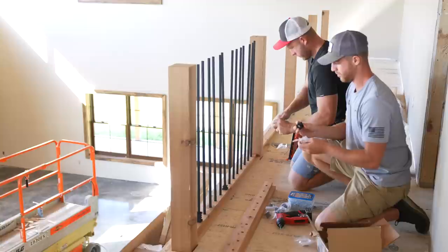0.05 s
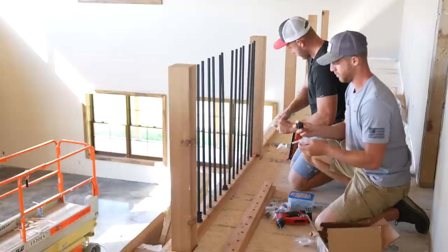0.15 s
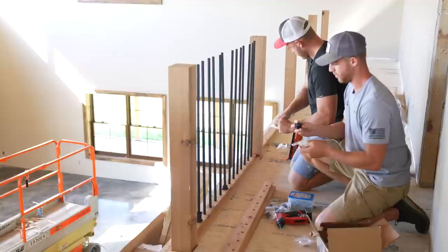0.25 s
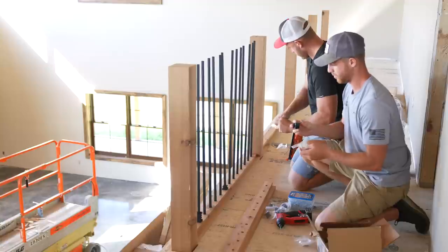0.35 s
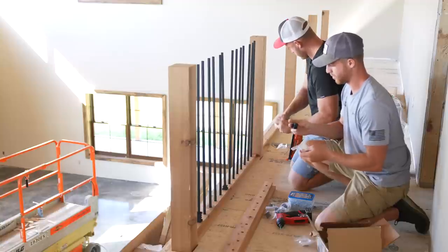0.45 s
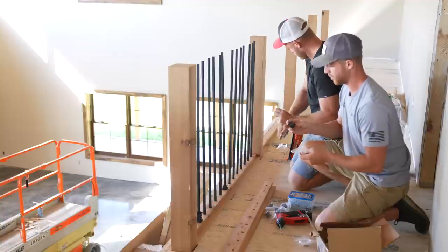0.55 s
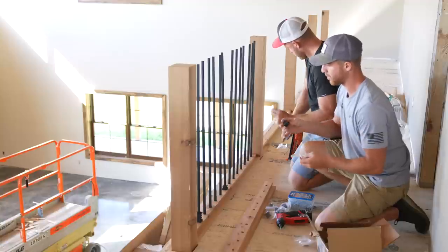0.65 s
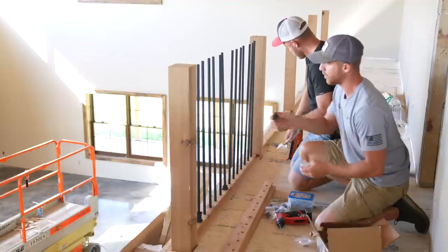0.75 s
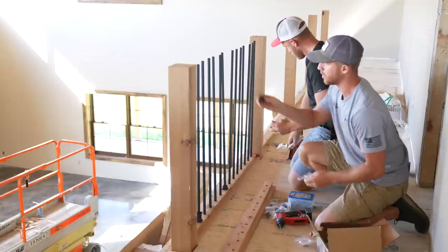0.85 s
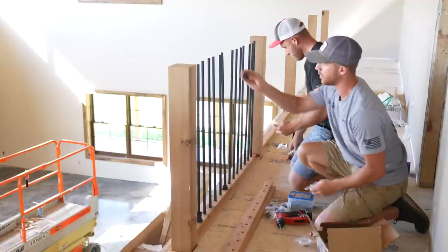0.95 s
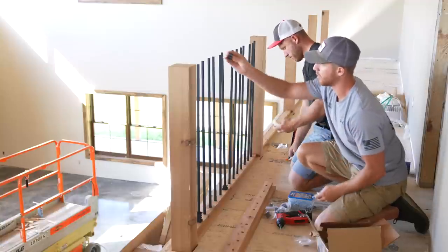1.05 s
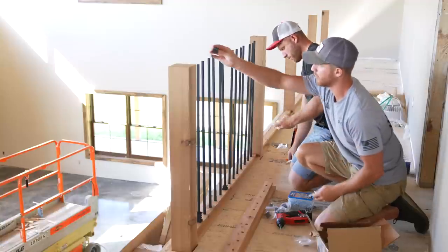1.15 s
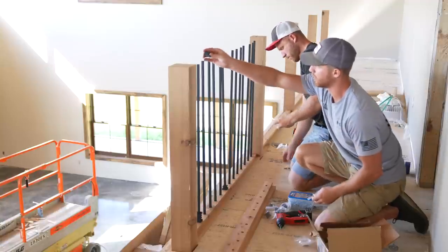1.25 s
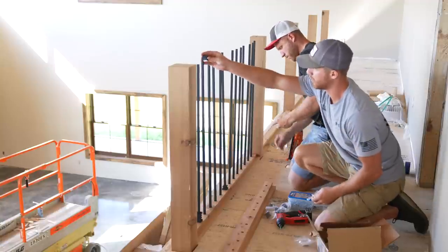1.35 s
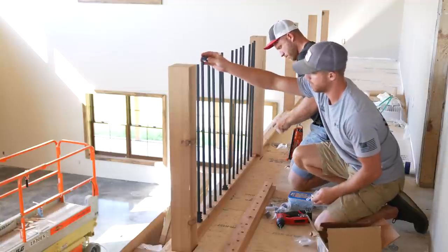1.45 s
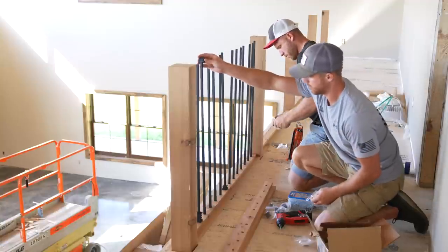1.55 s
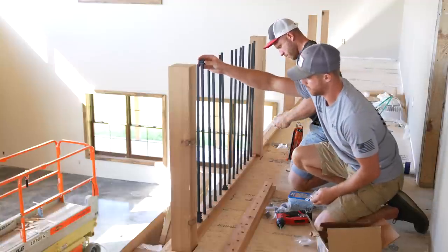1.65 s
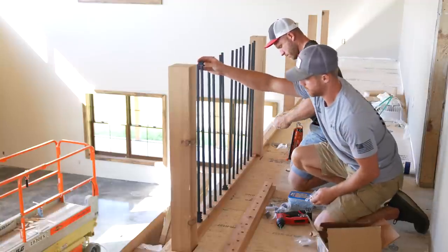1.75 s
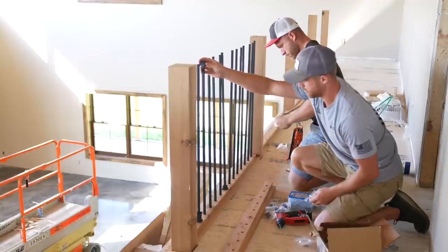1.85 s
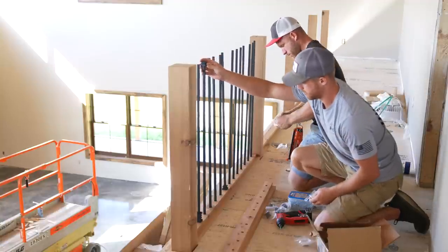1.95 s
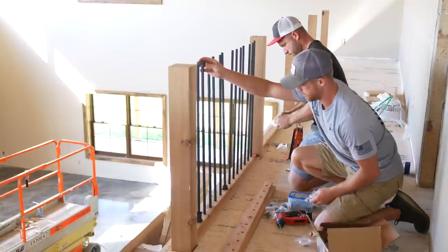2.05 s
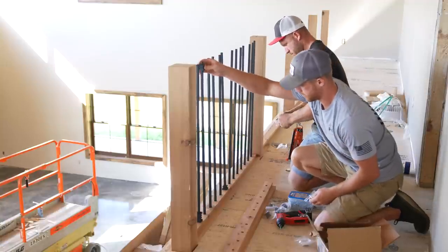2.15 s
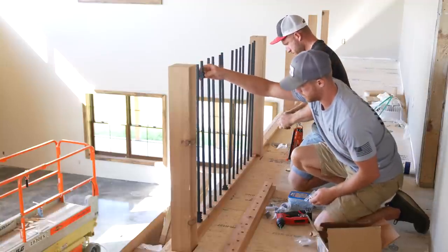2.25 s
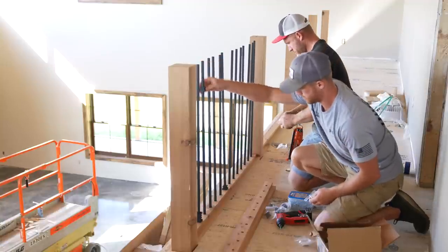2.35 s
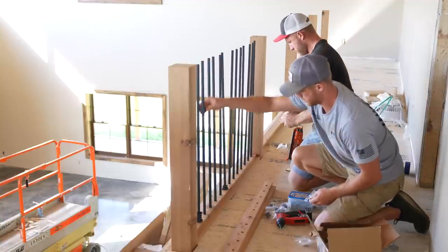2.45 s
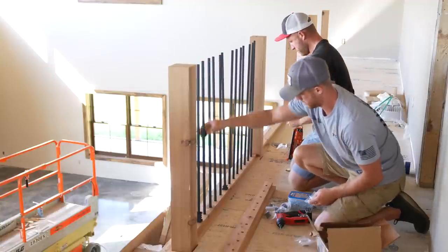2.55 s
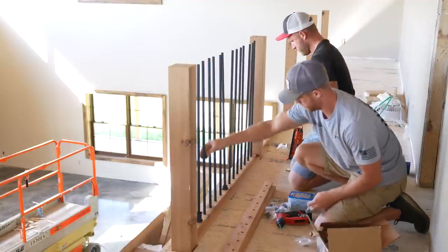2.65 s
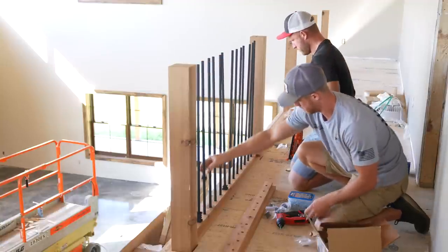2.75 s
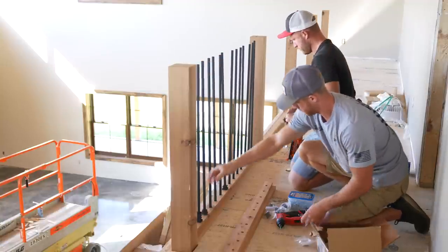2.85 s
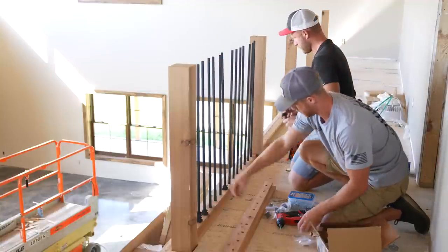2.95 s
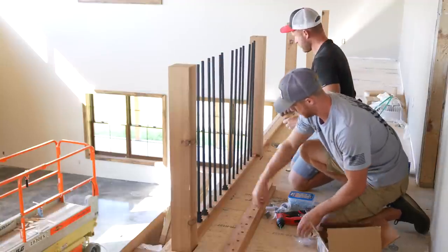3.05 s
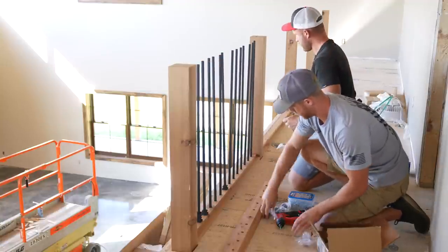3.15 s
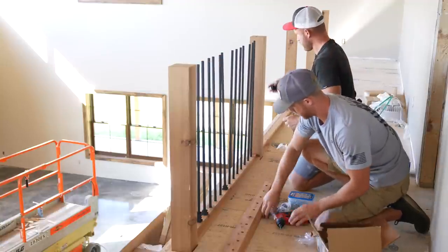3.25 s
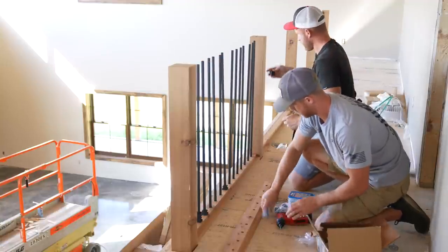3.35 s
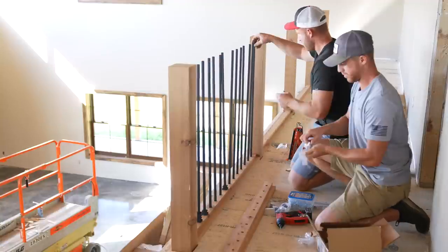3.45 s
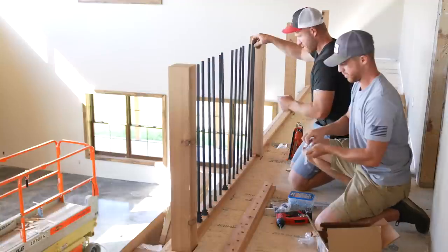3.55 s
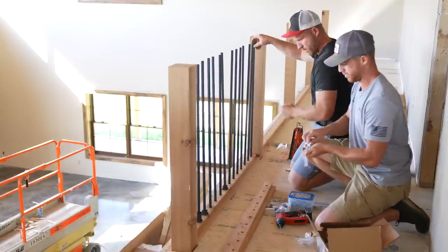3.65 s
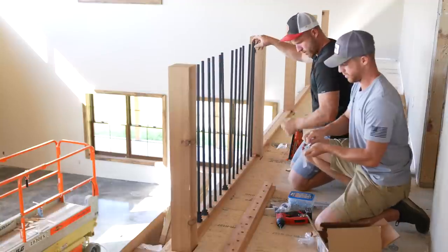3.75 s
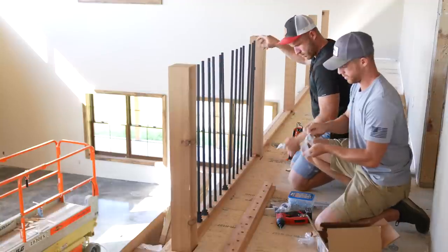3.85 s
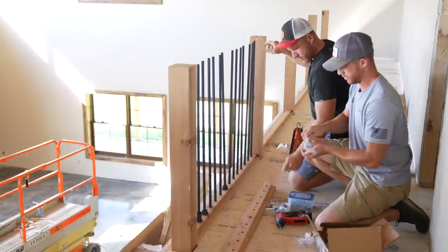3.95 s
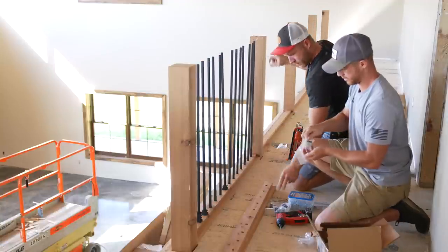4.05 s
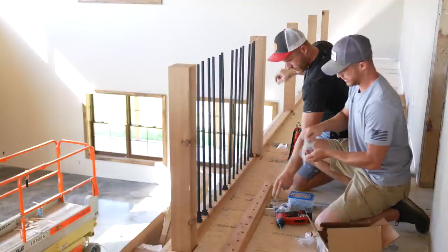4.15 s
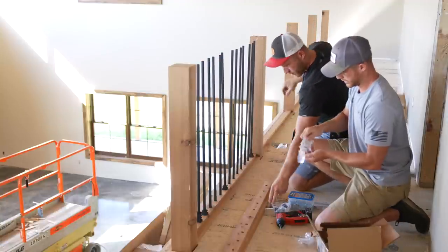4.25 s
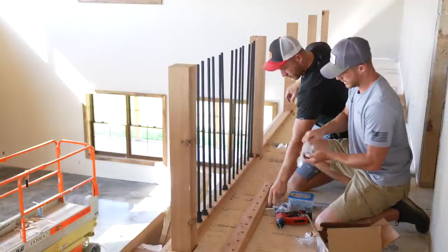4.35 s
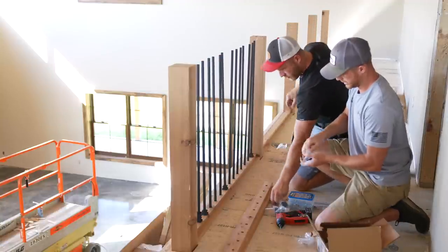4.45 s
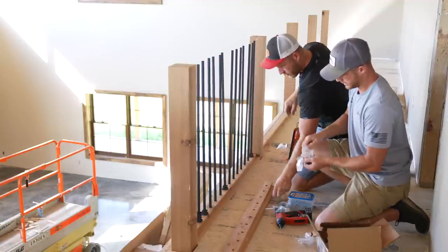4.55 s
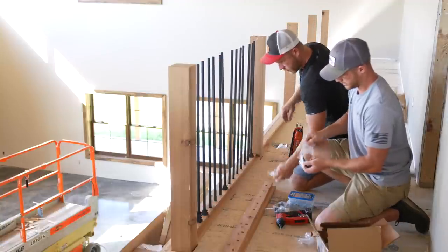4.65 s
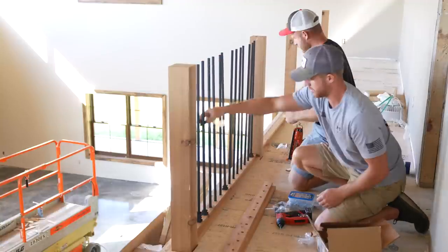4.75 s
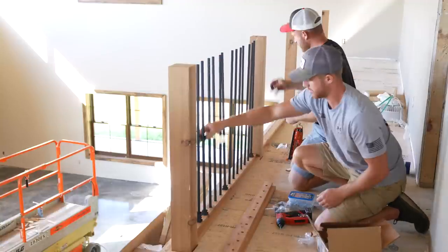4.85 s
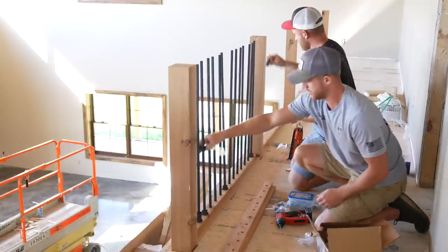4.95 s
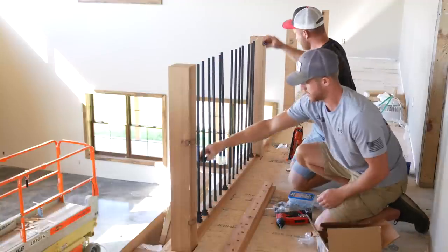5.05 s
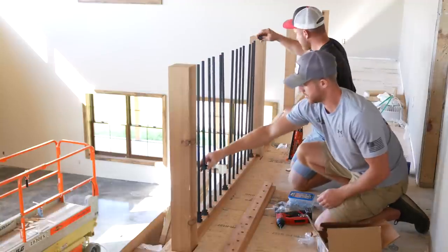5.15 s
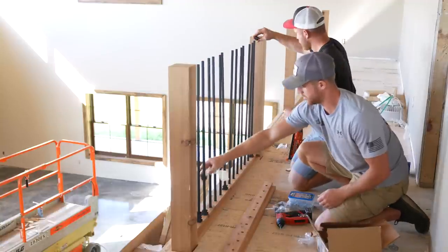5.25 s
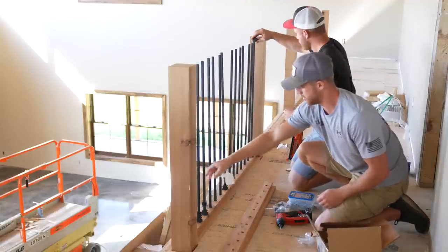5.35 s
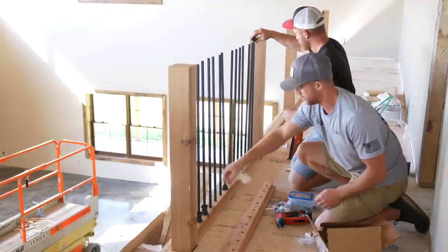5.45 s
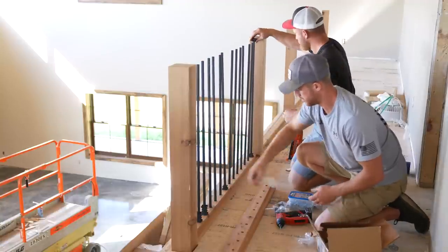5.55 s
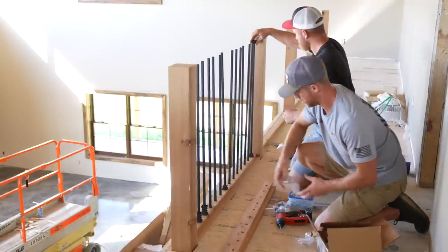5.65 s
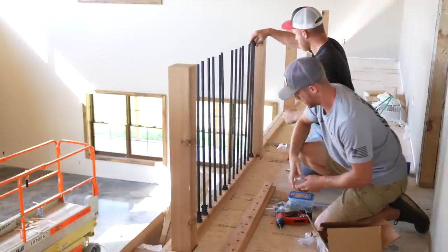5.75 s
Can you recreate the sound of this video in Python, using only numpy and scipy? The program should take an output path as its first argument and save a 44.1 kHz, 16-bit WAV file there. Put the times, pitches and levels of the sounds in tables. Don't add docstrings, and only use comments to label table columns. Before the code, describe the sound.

Close to the microphone in a hard, empty building, a brief metallic rub and stiff wrapping crackles open the scene. A dull clunk with quick rebounds lands at 0.5 s, followed by sparse crackles and faint high squeaks near 1.2 s. A short clank with a woody knock comes at 1.3 s, then dense metal ticks and soft bar taps. From 2.2 s a collar slides down an iron bar, its singing scrape swelling into a thin whine, ending at 2.9 s in a loud, sharp, ringing drop on timber. The echo is cut near 3.45 s. Faint scrapes and ticks lead to a second ringing clank at 4.2 s, with rattling rebounds. Low plank knocks follow around 4.6 s. After another cut, a steadier singing slide runs from 4.8 to 5.35 s, then a very bright, hard clank at 5.45 s bounces and echoes out. Quiet air and rustling clothes lie underneath.

```python
import sys
import numpy as np
from scipy import signal
from scipy.fft import rfft, irfft
from scipy.io import wavfile
from scipy.ndimage import uniform_filter1d

SR = 44100
rng = np.random.default_rng(int(sys.argv[2]) if len(sys.argv) > 2 else 0)


def ratio_of_db(decibels):
    return 10 ** (np.asarray(decibels, float) / 20)


def digitize_waveform(pressure):
    field = np.atleast_2d(pressure).T
    bounded = np.clip(field, -1, 1)
    quanta = np.round(bounded * 32767).astype(np.int16)
    wavfile.write(sys.argv[1], SR, quanta)


N = 255339


def peaked(x, db):
    return x * ratio_of_db(db) / np.max(np.abs(x))


def unit(x):
    return x / np.sqrt(np.mean(x ** 2))


def smooth_noise(samples):
    return unit(uniform_filter1d(uniform_filter1d(rng.standard_normal(N), samples), samples))


def add(track, s, sound):
    i = int(s * SR)
    track[i:i + len(sound)] += sound[:N - i]


def on_log(hz, table):
    table_hz, value = np.transpose(table)
    return np.interp(np.log(hz + 1), np.log(table_hz), value)


def high_pass(x, order, hz):
    return signal.sosfilt(signal.butter(order, hz, "high", fs=SR, output="sos"), x)


def resonate(x, hz, width_hz):
    return signal.lfilter(*signal.iirpeak(min(hz, .45 * SR), hz / width_hz, fs=SR), x)


def coloured(x, table):
    gain = ratio_of_db(on_log(np.fft.rfftfreq(len(x), 1 / SR), table))
    cepstrum = irfft(np.log(gain), len(x))
    cepstrum[1:len(x) // 2] *= 2
    cepstrum[len(x) // 2 + 1:] = 0
    return irfft(rfft(x) * np.exp(rfft(cepstrum)), len(x))


def burst(decay_s, rise_s=0.0003):
    t = np.arange(4096) / SR
    return rng.standard_normal(len(t)) * (1 - np.exp(-t / rise_s)) * np.exp(-t / decay_s)


def bouts(rows):
    t = np.arange(N) / SR
    swells = [db - np.maximum(rise * (s - t), fall * (t - s)) for s, db, rise, fall in rows]
    return ratio_of_db(np.max(swells, axis=0))


def first_contact(hz, crack_ms):
    t = np.arange(4096) / SR
    turn = 2 * np.pi * hz * t
    tones = np.sin(turn) + ratio_of_db(-8) * np.sin(1.9 * turn)
    return tones * t * np.exp(-t / (.0006 * crack_ms))


def ring(modes):
    t = np.arange(int(.52 * SR)) / SR
    hz, db, t60 = np.transpose(modes)[:, :, None]
    phase, detune, twin_phase = rng.random((3, len(modes), 1))
    twin_hz = hz * (1.005 + .012 * detune)
    pair = np.sin(2 * np.pi * (hz * t + phase)) + .6 * np.sin(2 * np.pi * (twin_hz * t + twin_phase))
    fade = np.exp(-np.log(1000) * t / t60)
    return np.sum(ratio_of_db(db) * fade * pair, axis=0) * (1 - np.exp(-t / 0.000044))


# start in seconds, peak level in dB, crack pitch
# in Hz, crack length in ms, level sent to the room in dB.
DROPS = [
    (0.5093, -9, 2800, 0.68, -17.5),
    (1.3245, -6, 2630, 0.85, -6),
    (2.93, 1.5, 3390, 0.65, -9),
    (4.1665, -2.5, 3250, 0.84, -7),
    (5.4468, 2, 9300, 0.21, -10.5),
]
DROP_GRIT_DB = [-3.5, -2.5, -4, -2, -5.5]
# frequency in Hz, level in dB per Hz.
DROP_COLOURS = [
    [(47, -64), (80, -31), (248, -12), (296, -39), (471, -11.5), (785, -8.5), (5900, -2), (16000, -12.5)],
    [(60, -50), (150, -12.5), (700, -6.5), (1100, -1.5), (1600, 0), (2500, -7), (5000, -12.5), (16000, -18)],
    [(380, -28), (482, -16), (643, -25), (810, -10.5), (1060, -16.5), (2400, 0.5), (5400, -3.5),
     (16000, -22)],
    [(47, -73), (80, -37.5), (400, -14.5), (802, -26.5), (1000, -15.5), (3620, -3.5), (8050, -12),
     (16000, -20.5)],
    [(60, -37), (369, -25.5), (493, -24.5), (550, -33.5), (820, -19), (980, -22), (2780, -6.5),
     (16000, -15.5)],
]
DROP_MODES_HZ = [
    [800, 3020, 4370, 5240],
    [820, 1070, 1400, 2700],
    [490, 822, 1240, 2320, 2980, 3225, 3700, 4550, 5300, 6150, 9625, 14230, 15400],
    [480, 822, 1750, 2320, 2966, 3714, 4468, 5276, 6148, 9604, 11260, 14520, 15300],
    [492, 822, 1965, 2750, 3058, 3600, 4549, 5560, 7515, 9760, 14400],
]
# level in dB, t60 in seconds.
DROP_RINGS = [
    [(1.5, 0.017), (-8, 0.037), (-12, 0.032), (-7.5, 0.027)],
    [(-8, 0.029), (-7.5, 0.13), (-14, 0.23), (-0.5, 0.042)],
    [(-27, 0.82), (-22, 0.9), (-27.5, 0.91), (-6.5, 0.17), (-9.5, 0.2), (4, 0.038), (-12, 0.24),
     (-19, 0.13), (-6, 0.093), (-4, 0.054), (-20, 0.18), (-15, 0.09), (-12, .07)],
    [(-28, 0.42), (-6.5, 0.1), (-4.5, 0.04), (-9, .07), (-35, .09), (-9, 0.28), (-9, 0.2), (-8, 0.069),
     (1, 0.031), (-29, 0.35), (-14, .1), (-16, .15), (-17, .08)],
    [(-29, 0.66), (-28, 1), (-2.5, 0.061), (5.5, 0.03), (-8, 0.18), (4, 0.051), (4.5, 0.047), (4.5, 0.021),
     (-8, 0.25), (-12, 0.11), (-34, .4)],
]
# start in seconds, level in dB relative to the drop.
REBOUNDS = [
    [(.512, -6.5), (.517, -11.5), (.523, -6.5), (.527, -16), (.5355, -13)],
    [(1.33, -12.5), (1.35, -50)],
    [(2.934, -12.5), (2.939, -14), (2.9425, -10.5), (2.9455, -18), (2.9495, -17), (2.9755, -19),
     (2.982, -18)],
    [(4.1682, -1), (4.172, -7.5), (4.179, -9), (4.186, -19), (4.2135, -13), (4.218, -17), (4.234, -16.5)],
    [(5.449, -10), (5.458, -14.5), (5.464, -14.5), (5.492, -16), (5.505, -17), (5.544, -22)],
]


def drops():
    near, send = np.zeros(N), np.zeros(N)
    t = np.arange(4096) / SR
    thump = np.sin(2 * np.pi * 130 * t) * np.exp(-t / 0.0029)
    rows = zip(DROPS, DROP_GRIT_DB, DROP_COLOURS, DROP_MODES_HZ, DROP_RINGS, REBOUNDS)
    for (s, db, hz, crack_ms, room_db), grit_db, colour, mode_hz, rings, rebounds in rows:
        modes = np.column_stack([mode_hz, rings])
        radiated = unit(coloured(1. * (t == 0), colour)) / np.sqrt(len(t))
        for when, below_db in [(s, 0)] + rebounds:
            hit_db = db + below_db
            slower = 5.5 - below_db / 12
            grit = burst(0.00027 * crack_ms * slower, 0.0014 * slower)
            impact = peaked(coloured(grit, colour), hit_db + grit_db)
            impact = signal.lfilter(*signal.butter(1, 16000 * ratio_of_db(.6 * below_db), fs=SR), impact)
            crack = peaked(first_contact(hz, crack_ms), db + 1.7 * below_db - 1.5)
            ringing = peaked(ring(modes), hit_db - 12)
            add(near, when, impact + crack + thump * ratio_of_db(1.6 * db + below_db - 27))
            add(near, when, ringing)
            add(send, when, radiated * ratio_of_db(hit_db + room_db + 13.5))
            add(send, when, ringing * ratio_of_db(room_db - 8.0))
    return near, send


def rubbed(modes, flicker_db):
    out = np.zeros(N)
    for hz, width_hz, db in modes:
        grit = rng.standard_normal(N) * ratio_of_db(flicker_db * smooth_noise(1000))
        once = resonate(grit, hz, width_hz)
        out += ratio_of_db(db) * (resonate(once, hz, width_hz) + 0.17 * once)
    return unit(out)


def locked_whine():
    hz = 3715 + 9 * smooth_noise(1200)
    return np.sin(2 * np.pi * np.cumsum(hz) / SR) * ratio_of_db(1.5 * smooth_noise(1200))


# frequency in Hz, width in Hz, level in dB.
BAR_MODES = [(490, 110, -11), (820, 130, -9), (1240, 80, -9), (1760, 170, -5), (2380, 140, -4),
             (2600, 3000, -17), (3010, 90, -4), (3712, 60, -6), (4470, 90, -10), (5290, 130, -11),
             (6170, 110, -12), (7080, 80, -17), (7980, 80, -20), (8950, 50, -23)]
# frequency in Hz, width in Hz, level in dB.
BAR_HELD_HIGHER = [(495, 90, -7), (812, 110, -8), (1245, 60, -9), (1740, 110, -7), (2380, 150, -8),
                   (2600, 3000, -19), (3010, 80, -5), (3712, 35, -9), (4470, 50, -7), (5290, 70, -12),
                   (6165, 100, -12), (7100, 55, -16), (7990, 60, -19), (8950, 40, -24)]
# frequency in Hz, width in Hz, level in dB.
COLLAR_MODES = [(9320, 80, -12), (9650, 120, -19), (9900, 250, -18), (11050, 200, -22), (12000, 900, -28),
                (14250, 200, -11), (14650, 300, -14), (15100, 350, -15), (15550, 250, -17)]
# time in seconds, level in dB.
LONG_STROKES = [
    [(2.19, -62), (2.23, -53), (2.3, -65), (2.37, -51.5), (2.45, -45), (2.55, -43.5), (2.7, -45.5),
     (2.84, -51.5), (2.925, -59)],
    [(4.79, -49.5), (4.9, -51), (5.03, -48.5), (5.15, -52), (5.26, -54), (5.35, -68.5)],
]
# whine level in dB, collar level in dB, how closely the collar follows pressure.
STROKE_WHINE_DB = [-8, -6]
STROKE_COLLAR_DB = [-0.6, 1.8]
STROKE_COLLAR_FOLLOW = [0.87, 1.6]
# start in seconds, length in seconds, level in dB,
# collar level in dB.
SHORT_NUDGES = [(0, 0.11, -56, -12), (3.465, 0.28, -63, -7), (3.825, 0.099, -58, 0),
                (3.989, 0.078, -58.5, 3), (5.367, 0.084, -53, -4)]


def slides():
    t, out = np.arange(N) / SR, np.zeros(N)
    bars = [rubbed(BAR_MODES, flicker_db=2.), rubbed(BAR_HELD_HIGHER, flicker_db=2.)]
    collar = rubbed(COLLAR_MODES, flicker_db=2.5)
    whine = locked_whine()
    moves = []
    for i, stroke in enumerate(LONG_STROKES):
        singing = bars[i] + whine * ratio_of_db(STROKE_WHINE_DB[i])
        moves.append((stroke, STROKE_COLLAR_DB[i], STROKE_COLLAR_FOLLOW[i], singing))
    for s, long_s, db, collar_db in SHORT_NUDGES:
        eased_db = db - 73 * long_s
        moves.append(([(s, db), (s + long_s, eased_db)], collar_db, 0.95, bars[1]))
    for pressure, collar_db, follow, bar in moves:
        s, db = np.transpose(pressure)
        touch = np.clip(np.minimum(t - s[0], s[-1] - t) / 0.0026, 0, 1)
        press_db = np.interp(t, s, db)
        sung = collar * ratio_of_db(collar_db - 59.5 + follow * (press_db + 49.5))
        out += touch * (bar * ratio_of_db(press_db) + sung)
    return out


def click(hz, treble_db):
    decay_s = 0.0022
    snap = high_pass(burst(decay_s, 0.00016) + 2.8 * burst(0.00026, 0.0001), 2, 0.47 * hz)
    pitched = peaked(resonate(resonate(snap, hz, hz / 1.8), hz, 1.5 * hz), 0)
    body = peaked(resonate(burst(2.0 * decay_s), 1100, 1500), -13.5)
    edge = high_pass(burst(0.21 * decay_s), 2, 7000)
    return pitched + body + peaked(edge, treble_db)


# start in
# seconds, peak level in dB, pitch in Hz, treble in dB relative to the peak.
CRACKLE_AND_TICKS = [(0.0673, -25, 2950, -17), (0.0615, -38, 2800, -20), (0.131, -33, 2800, -27),
                     (0.213, -33, 9000, -5), (0.4365, -28.5, 2500, -14), (0.4445, -31, 2700, -25),
                     (0.5088, -33, 9000, 0), (0.139, -24.5, 2750, -10), (0.1467, -19.5, 2560, -20),
                     (0.1675, -14.5, 1810, -24), (0.1749, -17, 5240, -23), (0.193, -25.5, 3020, -32),
                     (0.205, -28, 3000, 5), (0.2254, -32, 3140, 3), (0.255, -28, 5870, -15),
                     (0.2602, -20.5, 2800, -6), (0.2644, -33, 1650, -21.5), (0.319, -21, 7740, -36),
                     (0.3369, -22, 3240, -43), (0.348, -37, 1440, -45), (0.388, -23, 4640, -22),
                     (0.406, -29, 4800, -16), (0.432, -25.5, 2800, -18), (0.4546, -16.5, 2750, -54.5),
                     (0.7454, -31, 2900, -20), (0.774, -33, 2470, -25), (0.8493, -16.5, 3020, 4),
                     (0.8604, -41, 2870, -12), (0.8832, -30.5, 1670, -30), (1.0157, -37.5, 2180, -20),
                     (1.146, -29.5, 2480, -17), (1.1518, -28, 5470, -24), (1.175, -29.5, 2370, -30),
                     (1.238, -27, 2780, -14), (1.273, -28, 2300, -37),
                     (1.0882, -45.5, 1900, -20), (1.106, -51, 7600, -20), (1.3045, -43.5, 2100, -25),
                (1.351, -22, 4200, 0), (1.3515, -23.5, 6400, -5), (1.367, -24, 9000, -8),
                (1.395, -21.5, 2583, -20), (1.456, -25, 3790, -17), (1.471, -32.5, 5000, -7),
                (1.48, -28.5, 3000, -20), (1.5044, -28.5, 6200, -4), (1.5426, -31, 4500, -10),
                (1.6074, -26, 2500, -19.5), (1.6676, -22.5, 3155, 4.5), (1.696, -21, 4500, -5),
                (1.736, -25.5, 4510, -15), (1.7694, -28.5, 2776, -12), (1.7964, -23, 2720, -2),
                (1.8267, -25, 2750, 11), (1.878, -16, 2670, -25), (1.928, -26, 2570, -30),
                (1.965, -32.5, 1996, -25), (1.992, -26.5, 2600, -7.5), (2.0208, -17, 2656, -13),
                (2.071, -31.5, 2615, -25), (2.1322, -26, 2800, -29), (2.152, -28.5, 2487, -12),
                (2.172, -32, 2450, -20), (2.2255, -33.5, 5000, -14), (2.241, -23.5, 2377, -30.5),
                (2.2415, -31, 7000, -12), (2.2699, -26, 1700, -11), (2.2705, -31, 5490, -13.5),
                (2.319, -26, 1805, -23.5), (2.3346, -24.5, 3500, -27), (2.3503, -14.5, 3800, -16),
                (2.393, -33.5, 8000, -1.5), (2.4477, -24, 3010, -10), (2.533, -35.5, 5010, -13),
                (2.5814, -30.5, 7200, -9.5), (2.6554, -22.5, 2800, -15.5), (2.688, -35, 3000, -8.5),
                (2.7105, -22, 2800, 6.5), (2.787, -30.5, 4480, -7), (2.825, -35.5, 4500, -24.5),
                (2.8394, -30.5, 5490, 4.5), (2.854, -31.5, 2800, -24), (2.862, -34, 3490, -11),
                (2.914, -35.5, 3000, -11.5),
                     (0.2364, -33, 7000, -6), (0.2977, -42, 8000, -6), (0.464, -28, 4790, -20),
                 (3.2721, -45, 14900, 7), (3.3504, -49, 13000, 5), (3.3753, -40, 13600, 0),
                 (3.5555, -44.5, 2960, -12), (3.65, -46, 2350, -17), (3.798, -48, 2970, -12.5),
                 (3.8392, -30.5, 3000, 3), (3.8879, -32.5, 2600, -5), (3.904, -32.5, 2630, 3),
                 (3.9325, -35.5, 2720, -30), (3.978, -41.5, 10900, -13), (4.0104, -33, 2600, -14),
                 (4.0516, -30.5, 7950, -27), (4.106, -42, 3760, -32), (4.124, -33.5, 3680, -26),
                 (1.557, -33.5, 13500, -2), (1.867, -38, 11000, -3), (4.5535, -43, 7250, -6),
                 (4.5927, -29.5, 10400, -5), (4.6762, -44, 6050, 9), (5.4, -42, 6200, -3)]


def handling_ticks():
    out = np.zeros(N)
    for s, db, hz, treble_db in CRACKLE_AND_TICKS:
        add(out, s, click(hz, treble_db) * ratio_of_db(db - 8.0))
    return out


# start in seconds, peak level in dB.
BAR_TAPS = [(1.5637, -26), (1.74, -31.5), (2.0496, -32), (2.381, -41), (4.794, -40.5), (5.3694, -47),
            (1.236, -49)]
# frequency in Hz, width in Hz, level in dB.
TAP_MODES = [
    [(3250, 250, 8.5), (3710, 37, -18.5), (4580, 46, -3), (5330, 49, -2), (6150, 53, -8), (7100, 43, -9)],
    [(3010, 70, 0), (3650, 50, -5), (5240, 66, -13)],
    [(2800, 280, -2.5), (3620, 29, -5.5), (4570, 44, -6), (5370, 50, -11)],
    [(3080, 54, 3.5), (3700, 50, -14.5)],
    [(2380, 80, -16), (2860, 130, 6)],
    [(1790, 120, -0.5), (3030, 80, -9.5)],
    [(2103, 50, 8), (2700, 90, 0), (3130, 60, -6), (3600, 60, -8)],
]


def bar_taps():
    out = np.zeros(N)
    for (s, db), modes in zip(BAR_TAPS, TAP_MODES):
        push = burst(0.018, 0.001)
        tap = np.zeros(len(push))
        for hz, width_hz, mode_db in modes:
            tap += ratio_of_db(mode_db) * resonate(push, hz, width_hz) * np.sqrt(100 / width_hz)
        add(out, s, peaked(tap, db))
    return out


# start in seconds, peak level in dB, pitch in Hz.
PLANK_KNOCKS = [(0.026, -39.5, 900), (0.04, -40, 815), (2.017, -31.5, 1340), (2.021, -35, 573),
                (2.052, -37.5, 1090), (1.3305, -16, 1100), (1.349, -28, 1090), (1.406, -23, 1220),
                (4.553, -33.5, 1140), (4.592, -33, 905), (4.611, -28.5, 820), (4.71, -37, 1150),
                (4.626, -28.5, 760), (4.678, -34, 684)]


def plank_knocks():
    out = np.zeros(N)
    for s, db, hz in PLANK_KNOCKS:
        wood = resonate(resonate(burst(0.0055), hz, hz / 1.3), hz, 1.1 * hz)
        add(out, s, peaked(wood, db))
    return out


# peak time in seconds, peak level in dB,
# rise and fall in dB per second, mode in Hz.
COLLAR_SCUFFS = [(3.472, -67, 598, 9600), (3.9, -69, 97.5, 9740), (4.028, -72, 142, 9620),
                 (4.14, -78, 202, 9700), (5.715, -65, 200, 14400), (5.7, -61, 60, 7630)]


def scuffs():
    grit = rng.standard_normal(N)
    out = np.zeros(N)
    for s, db, slope, hz in COLLAR_SCUFFS:
        out += unit(resonate(grit, hz, 68)) * bouts([(s, db, slope, slope)])
    return out


# time of highest pitch in seconds, half length in seconds,
# highest pitch in Hz, level in dB.
WRAPPING_SQUEAKS = [
    (1.215, .095, 12700, -78),
    (1.23, .095, 14200, -81),
]


def squeaks():
    t, out = np.arange(N) / SR, np.zeros(N)
    for s, half_s, hz, db in WRAPPING_SQUEAKS:
        arch = np.minimum(((t - s) / half_s) ** 2, 1)
        tone = np.sin(2 * np.pi * np.cumsum(hz * (1 - .11 * arch)) / SR)
        heard = (arch < 1) * (t > s - half_s * (hz < 13000))
        out += tone * ratio_of_db(db - 10 * arch) * heard
    return out


def early_echoes(close):
    t = np.arange(8192) / SR
    early = rng.standard_normal(len(t)) * ratio_of_db(-60 * t / 0.045) * (t > .002)
    early *= ratio_of_db(-13.5) / np.sqrt(np.sum(early ** 2))
    return signal.fftconvolve(close, early)[:N]


SCENE_CHANGES = [0, 3.456, 3.83, 4.79, 6]
# frequency in Hz, t60 in seconds.
HALL_T60 = [(60, 2.5), (250, 1.03), (1000, 2.24), (3000, 1.63), (6000, 1.27), (10000, 0.8), (16000, 0.2)]
# frequency in Hz, level in dB.
HALL_FEED = [(60, -23), (250, 13), (1000, 2), (3000, -4), (6000, -7.5), (10000, -10.5), (16000, 2)]


def hall(send):
    t = np.arange(int(1.6 * SR)) / SR
    hz, s, cells = signal.stft(rng.standard_normal(len(t)), SR, nperseg=256)
    fade_db = 60 * s / on_log(hz, HALL_T60)[:, None]
    cells = cells * ratio_of_db(on_log(hz, HALL_FEED)[:, None] - fade_db)
    tail = signal.istft(cells, SR, nperseg=256)[1][:len(t)] * (1 - np.exp(-t / 0.00088))
    tail /= np.sqrt(np.sum(tail ** 2))
    now, out = np.arange(N) / SR, np.zeros(N)
    for start, end in zip(SCENE_CHANGES[:-1], SCENE_CHANGES[1:]):
        shot = np.clip(np.minimum(now - start, end - now) / 0.013 + .5, 0, 1)
        out += shot * signal.fftconvolve(send * shot, tail)[:N]
    return out


# peak time in seconds, peak level in dB.
HISS_SWELLS = [(.95, -87), (1.36, -101), (1.7, -72), (2.3, -76), (3.0, -65.5), (3.37, -79), (3.9, -82),
               (4.15, -64.5), (4.5, -62.5), (5.1, -80), (5.4, -86), (5.55, -68)]


def bright_hiss():
    patchy = ratio_of_db(2.5 * unit(uniform_filter1d(rng.standard_normal(N), 500)))
    hiss = unit(high_pass(rng.standard_normal(N) * patchy, 2, 7500))
    swelling = ratio_of_db(-82.5) + bouts([(s, db, 107, 86) for s, db in HISS_SWELLS])
    return hiss * ratio_of_db(4.5) * swelling


# frequency in Hz, level in dB per Hz.
AIR_COLOUR = [(18, -65.5), (30, -23.5), (199, -5), (461, -6), (937, -12.5), (1430, -9), (8080, -33),
              (16000, -45.5)]
# time in seconds, level in dB.
AIR_LEVEL = [(0, -59), (.5, -67.5), (1.0, -66), (1.299, -63), (3.5, -62), (3.8, -64), (5.79, -61)]


def air():
    t, hz = np.arange(N) / SR, np.fft.rfftfreq(N, 1 / SR)
    hush = unit(irfft(rfft(rng.standard_normal(N)) * ratio_of_db(on_log(hz, AIR_COLOUR)), N))
    return hush * ratio_of_db(np.interp(t, *np.transpose(AIR_LEVEL)))


def scene():
    dropped, send = drops()
    rubbing = slides()
    small = handling_ticks() + bar_taps() + plank_knocks()
    close = dropped + small
    echoes = early_echoes(close) + hall(send + ratio_of_db(-11.0) * small + ratio_of_db(-13.5) * rubbing)
    return (close + rubbing + scuffs() + squeaks() + echoes + bright_hiss() + air())[None]


def top_cut(x):
    return signal.sosfilt(signal.butter(12, 16850, fs=SR, output="sos"), x)


def record(dry):
    bass_cut = high_pass(dry, 1, 35)
    rounded = .85 * bass_cut / (.85 ** 8 + bass_cut ** 8) ** .125
    mix = signal.sosfilt(signal.ellip(8, .2, 45, 15780, fs=SR, output="sos"), rounded)
    return top_cut(mix)


dry = scene()
out = record(dry)
digitize_waveform(out)
```